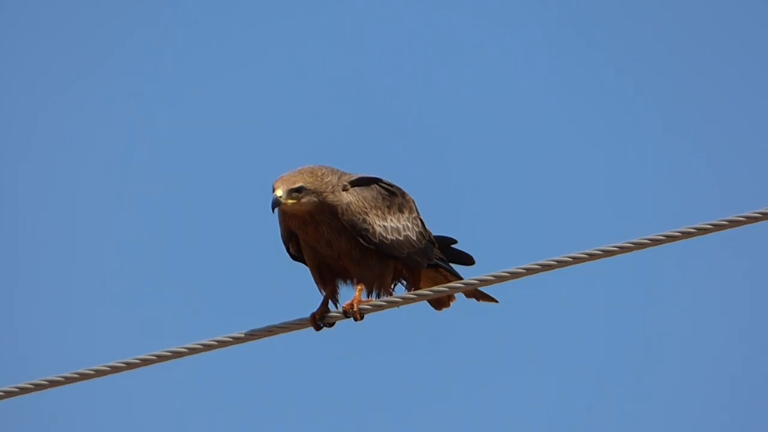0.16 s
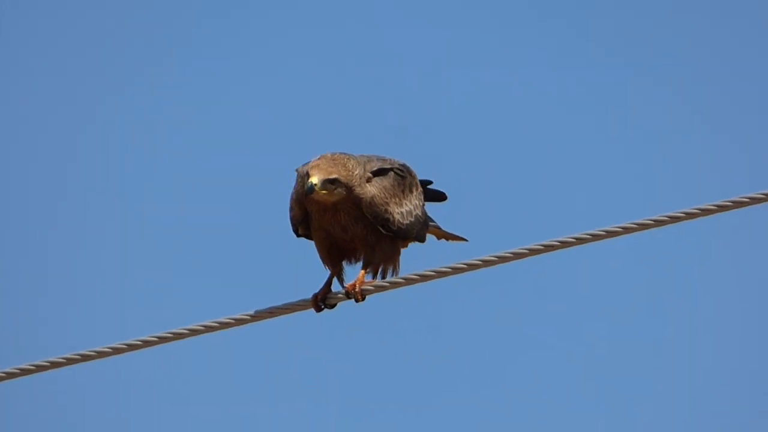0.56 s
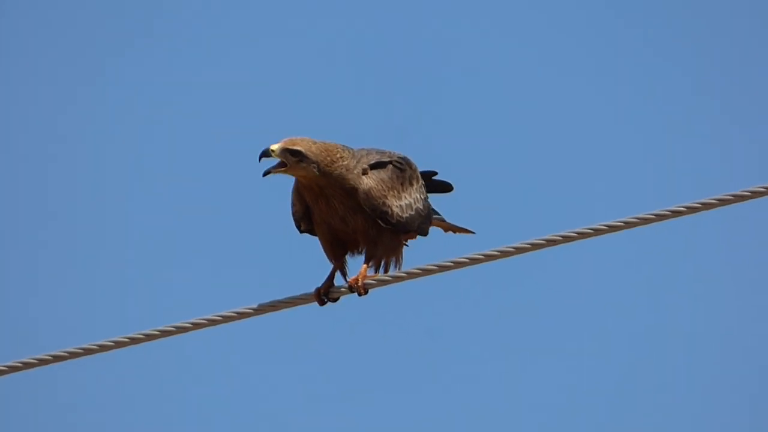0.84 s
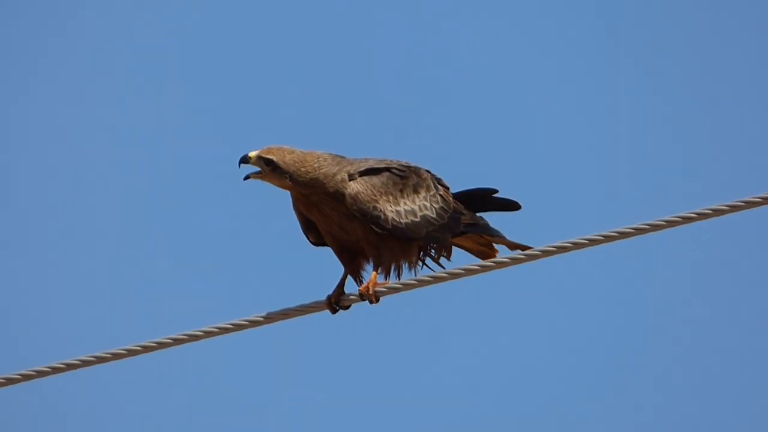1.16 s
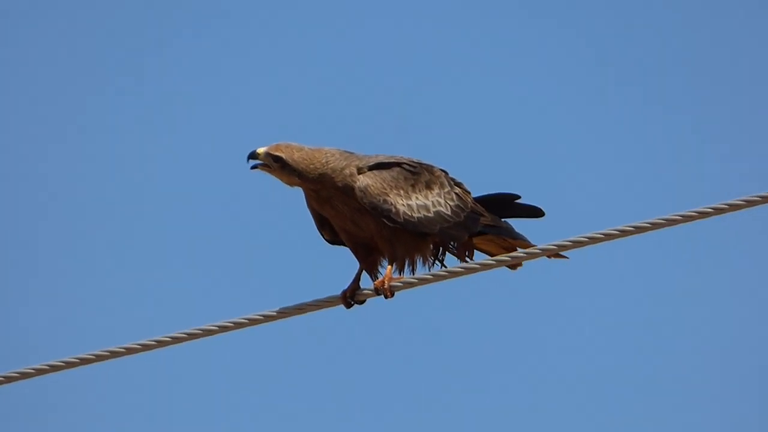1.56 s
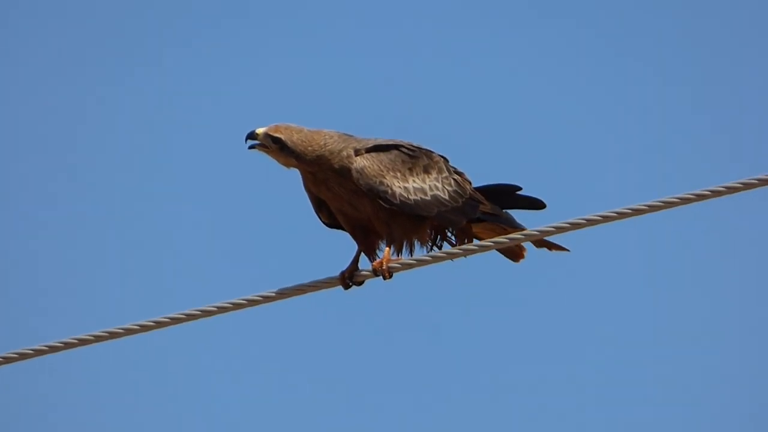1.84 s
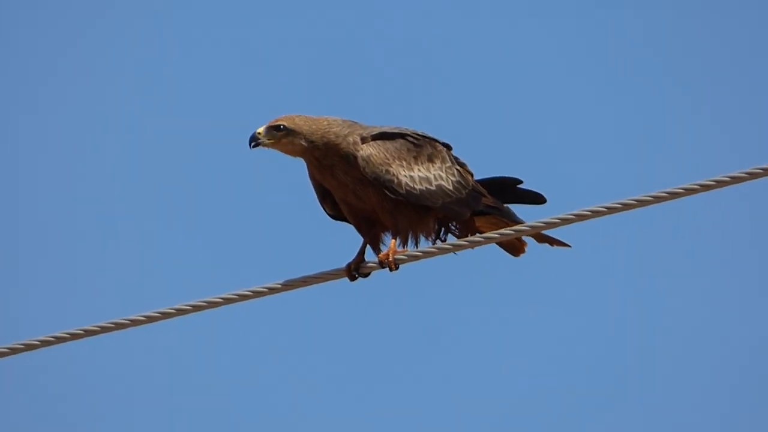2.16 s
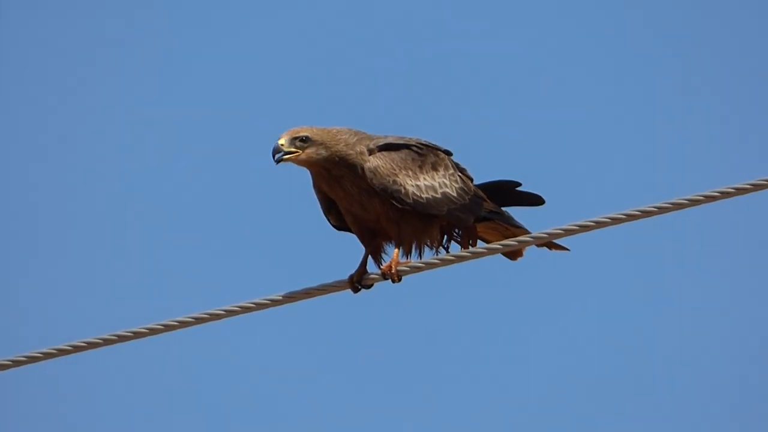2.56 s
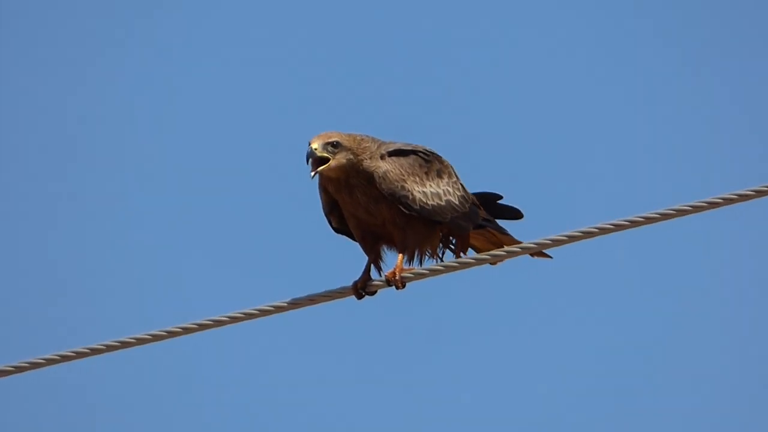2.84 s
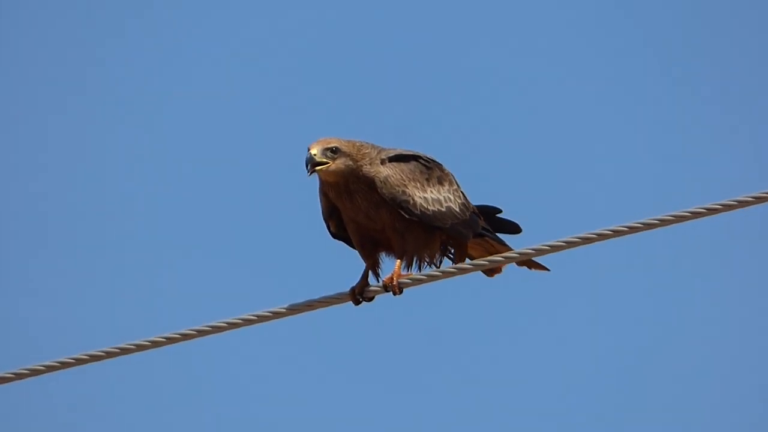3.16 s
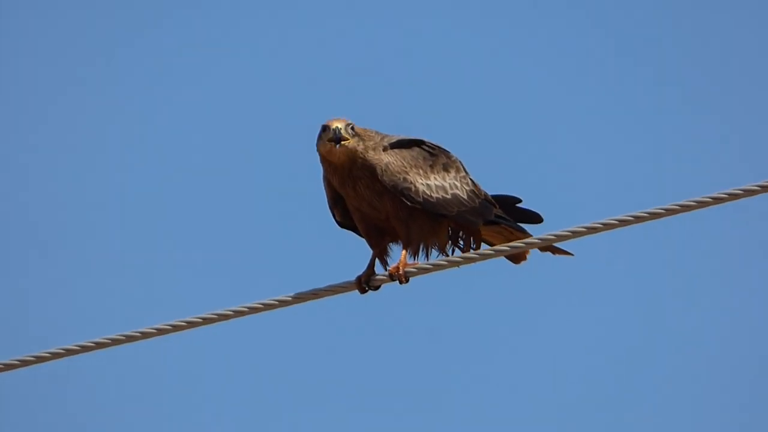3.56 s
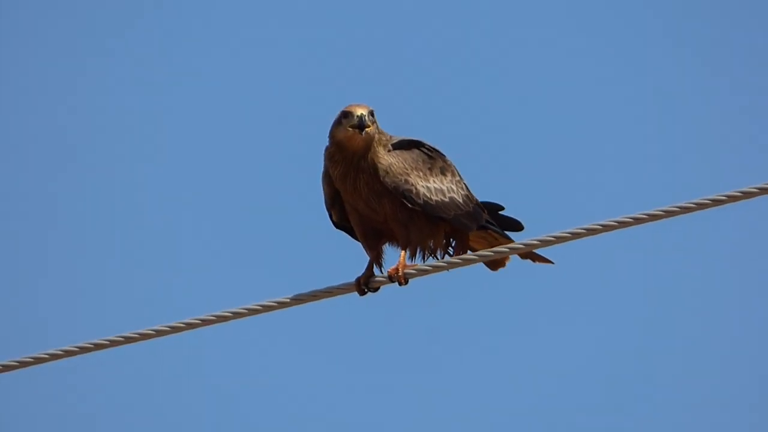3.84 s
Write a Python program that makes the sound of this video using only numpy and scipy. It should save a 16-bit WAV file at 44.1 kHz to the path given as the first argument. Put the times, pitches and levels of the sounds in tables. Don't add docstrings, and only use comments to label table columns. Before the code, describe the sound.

Silence until 0.33 s, then faint hum, hiss and wind. A kite yelps shrilly at 0.95 s, hiccups at 1.28, and quavers rapidly, sinking slightly, until 2.2. Soft gusts thump, mostly left, around 0.9 and 1.4; a sharp tiny click at 2.5. At 2.9 a louder whistle leaps up, drops, holds, then quavers brighter and rougher from 3.3 to 4.0, over a faint distant kite's rising whistles. Light open-air echo.

```python
import sys
import numpy as np
from scipy import signal
from scipy.fft import rfft, irfft, next_fast_len
from scipy.io import wavfile
from scipy.ndimage import uniform_filter1d, map_coordinates

SR = 44100
rng = np.random.default_rng(int(sys.argv[2]) if len(sys.argv) > 2 else 0)


def wrap_up_sound(samples):
    columns = np.atleast_2d(samples).T
    tamed = np.clip(columns, -1, 1)
    steps = np.round(tamed * 32767).astype(np.int16)
    wavfile.write(sys.argv[1], SR, steps)


def attenuation_scalar(level_db):
    decades = np.asarray(level_db, float) / 20
    return 10 ** decades


N = 176400

SIDE_TONES_DB = [-21, -16, -22, -22, -22, -21, -33, -36]
# start [s], length [s], pitch [Hz], level [dB].
VOICE_BREAKS = [
    (1.345, .026, 790, -55),
    (1.652, .008, 760, -70),
    (1.8, .012, 760, -70),
    (3.905, .045, 745, -46),
    (3.978, .034, 760, -44),
]
# start [s], length [s], level [dB].
BREATH_PUFFS = [
    (.918, .035, -59),
    (1.256, .05, -59),
    (2.903, .016, -55),
]
# frequency [Hz], gain [dB].
FACING_COLOUR = [(4700, -8), (5100, -2), (7200, -10), (8600, -12), (9800, -40), (10600, -22), (12300, -20),
                 (15500, -24)]
FACING_ORDERS_DB = [0, 0, -14, -11, -11]
FACING_SIDE_RATIO = .36
EDGE_S = .004


def unit(x):
    return x / np.sqrt(np.mean(x ** 2) + 1e-20)


def along(points, hz):
    f, v = np.transpose(points)
    return np.interp(np.log(hz + 1), np.log(f + 1), v)


def wobble(rate, size=N):
    knots = rng.standard_normal(int(size * rate / SR) + 4)
    return map_coordinates(knots, [np.arange(size) * rate / SR])


def filtered(x, response):
    m = next_fast_len(N + SR // 2)
    return irfft(rfft(x, m) * response(np.fft.rfftfreq(m, 1 / SR)), m)[..., :N]


def patchy(patchy_db):
    z = signal.stft(rng.standard_normal((2, N)), nperseg=512)[2]
    field = uniform_filter1d(rng.standard_normal(z.shape[1:]), 7, 0)
    field = uniform_filter1d(field, 6, 1)
    fade = 1 / (1 + (np.arange(len(field)) * SR / 512 / 1800) ** 4)
    gain = attenuation_scalar(patchy_db * unit(field) * fade[:, None])
    return signal.istft(z * gain, nperseg=512)[1][:, :N]


def shell_ring(modes, f):
    return 1 + sum(attenuation_scalar(db) * 1j * f * w / (c * c - f * f + 1j * f * w) for c, w, db in modes)


def hum():
    # frequency [Hz], level [dB per Hz].
    hum_mid = [(40, -95), (110, -87), (300, -90), (800, -91), (1350, -96), (1600, -106), (3000, -114),
               (15000, -140)]
    hum_side = [(40, -114), (150, -100), (400, -92), (800, -88), (1350, -92), (1700, -104), (3000, -114),
                (14000, -130)]
    # frequency [Hz], width [Hz], gain [dB].
    shell_mid = [(156, 10, 11), (350, 40, 7), (458, 24, 17), (650, 50, 7), (743, 30, 16), (945, 40, 3),
                 (1170, 50, 5)]
    shell_side = [(450, 50, 6), (650, 70, 8), (850, 70, 10)]
    # frequency [Hz], turn [radians].
    side_turn = [(160, .3), (350, 2.7), (600, 1.6), (1200, 1.2)]
    # frequency [Hz], level [dB per Hz].
    hiss_curve = [(1000, -112), (2100, -102), (2600, -108), (5200, -108), (6500, -113), (8000, -111),
                  (13000, -115), (15500, -121)]
    # time [s], strength [dB].
    wind_curve = [(0.34, -54), (0.81, -49), (2.03, -51), (2.05, -44), (2.1, -61), (2.14, -50), (2.21, -56),
                  (2.32, -48), (2.58, -53), (2.62, -64), (2.64, -50), (2.85, -47), (2.89, -53), (3.51, -51),
                  (3.54, -64), (3.56, -55), (3.76, -49), (4.0, -52)]
    # time [s], peak [dB].
    flurry_peaks = [(0.683, -43), (0.749, -41), (0.794, -43), (0.884, -39), (2.24, -44), (2.27, -43),
                    (2.297, -38), (2.49, -40), (2.644, -42), (2.681, -40), (2.727, -41)]
    t = np.arange(N) / SR

    a, b = patchy(patchy_db=1.8) * np.sqrt(SR / 2)
    share = lambda hz: .7 / (1 + (hz / 1700) ** 6)
    across = lambda hz: attenuation_scalar(along(hum_side, hz)) * shell_ring(shell_side, hz)
    turned = lambda hz: np.exp(1j * along(side_turn, hz)) * share(hz)
    mid = filtered(a, lambda hz: attenuation_scalar(along(hum_mid, hz)) * shell_ring(shell_mid, hz))
    side = filtered(a, lambda hz: across(hz) * turned(hz))
    side = side + filtered(b, lambda hz: across(hz) * np.sqrt(1 - share(hz) ** 2))
    pair = np.array([mid + side, mid - side])

    flurry = 0
    for s, db in flurry_peaks:
        rise = np.clip((t - s) / .004, 0, 1)
        flurry = flurry + attenuation_scalar(db + 37) * rise * np.exp(-np.abs(t - s) / .02)
    wind_db = np.interp(t, *np.transpose(wind_curve)) + 52
    gain = attenuation_scalar(.7 * wind_db + 1.5 * wobble(14)) * (1 + flurry)
    windy = filtered(pair, lambda hz: 1 / (1 + (np.log(hz / 620 + 1e-9) / .7) ** 4))

    hiss = filtered(rng.standard_normal((2, N)) * np.sqrt(SR / 2), lambda hz: attenuation_scalar(along(hiss_curve, hz)))
    mid, side = hiss * attenuation_scalar([[0], [-4]])
    return pair + windy * (gain - 1) + [mid + side, mid - side]


def gusts():
    # centre [s], length [s], level [dB].
    gust_rows = [(.36, .06, -56), (.7, .12, -54), (.79, .04, -54), (.86, .05, -44), (.96, .05, -52),
                 (1.26, .06, -43), (1.35, .14, -47), (1.447, .025, -37), (1.57, .2, -52), (2.98, .05, -53),
                 (3.63, .08, -55), (3.85, .25, -56), (3.45, .2, -58)]
    # frequency [Hz], gain [dB].
    thump_curve = [(30, -26), (80, -3), (190, 0), (330, -20), (600, -50), (1200, -120)]
    t = np.arange(N) / SR
    strength = sum(attenuation_scalar(db) * np.exp(-(2 * (t - s) / length) ** 2) for s, length, db in gust_rows)
    noise = filtered(rng.standard_normal((2, N)), lambda hz: attenuation_scalar(along(thump_curve, hz)))
    lumps = attenuation_scalar(3 * np.array([wobble(25), wobble(25)]))
    port_gain = attenuation_scalar([[5], [-3]])
    return port_gain * strength * unit((noise + .6 * noise[::-1]) * lumps)


def add(out, s, x):
    t = np.arange(len(x)) / SR
    edge = np.clip(np.minimum(t, t[-1] - t) / EDGE_S, 0, 1)
    part = out[round(s * SR):][:len(x)]
    part += (x * np.sin(np.pi / 2 * edge) ** 2)[:len(part)]


def voice(hz, db, over_db, tone_db, side_db, beak, ratio):
    n, (colour, orders_db) = len(hz), beak
    phase = 2 * np.pi * np.cumsum(hz) / SR
    tone = attenuation_scalar(tone_db) * np.exp(1j * phase)
    overs = 0
    for k, order_db in zip(range(2, 7), orders_db):
        fading_db = 1.0 * k * wobble(30, size=n)
        level_db = over_db + order_db + along(colour, k * hz) + fading_db
        overs = overs + attenuation_scalar(level_db) * np.exp(1j * k * phase)

    second = 2 * np.pi * np.cumsum(hz * ratio * (1 + .05 * wobble(90, size=n))) / SR
    breath = 1 + attenuation_scalar(-7) * (wobble(1500, size=n) + 1j * wobble(1500, size=n))
    pair = breath * (np.exp(1j * second) + attenuation_scalar(-12) * np.exp(-1j * second))
    haze = wobble(5000, size=n) + 1j * wobble(5000, size=n)
    burst = attenuation_scalar(side_db + 3 * wobble(35, size=n))
    rasp = burst * haze * (attenuation_scalar(-17) * tone + attenuation_scalar(-5) * overs)
    stack = (tone + overs) * (1 + burst * pair) + rasp
    shimmer_db = .7 * wobble(70, size=n)
    return np.sqrt(2) * attenuation_scalar(db + shimmer_db) * np.real(stack)


def note(rows, side_db, beak, ratio):
    s, *cols = np.transpose(rows)
    t = np.arange(s[0] - EDGE_S / 2, s[-1] + EDGE_S / 2, 1 / SR)
    glide = round(.008 * SR) + 1
    hz, db, over_db = [uniform_filter1d(np.interp(t, s, c), glide, mode="nearest") for c in cols]
    return t[0], voice(hz, db, over_db, 0, side_db, beak, ratio)


def quaver(rows, rule, beak, ratio):
    s, crest, trough, db = np.transpose(rows)
    start, end, best_hz, loss_db, over_db, first_db, last_db, dip_db = rule
    t, step = np.arange(start, end, 1 / SR), np.mean(np.diff(s))
    turn = np.interp(t, np.r_[s[0] - step, s, s[-1] + step], np.arange(len(s) + 2))
    swing = np.cos(2 * np.pi * turn)
    top, low = np.interp(t, s, crest), np.interp(t, s + step / 2, trough)
    hz = low + (top - low) * (1 + swing) / 2
    tone_db = -loss_db * ((hz - best_hz) / 100) ** 2
    level_db = np.interp(t, s + step / 2, db)
    side_db = np.linspace(first_db, last_db, len(t))
    return start, voice(hz, level_db, over_db - dip_db * swing, tone_db, side_db, beak, ratio)


def kite(notes, sides_db, trill, beak, ratio, breaks, puffs):
    # frequency [Hz], gain [dB].
    puff_curve = [(900, -30), (1600, -6), (3300, 0), (6000, -14), (13000, -30)]
    # multiple of the pitch, level [dB].
    break_parts = [(2, -5), (3, -6), (4, 0), (5, -12)]
    out = np.zeros(N)
    air = unit(filtered(rng.standard_normal(N), lambda hz: attenuation_scalar(along(puff_curve, hz))))
    for rows, side_db in zip(notes, sides_db):
        add(out, *note(rows, side_db, beak, ratio))
    if trill:
        add(out, *quaver(*trill, beak, ratio))
    for s, length, hz, db in breaks:
        u = np.linspace(0, np.pi, round(length * SR))
        phase = 2 * np.pi * np.cumsum(hz * (1 + .1 * (1 - np.sin(u)))) / SR
        whistle = out[round(s * SR):][:len(u)]
        add(out, s, -whistle * np.sqrt(np.abs(np.sin(u)))[:len(whistle)])
        add(out, s, attenuation_scalar(db) * np.sin(u) * sum(attenuation_scalar(g) * np.sin(k * phase) for k, g in break_parts))
    for s, length, db in puffs:
        add(out, s, attenuation_scalar(db) * air[round(s * SR):][:round(length * SR)])
    return out


def side_on_call():
    # time [s], pitch [Hz], level [dB], overtones [dB].
    yelp = [
        (.939, 2500, -50, 8),
        (.955, 2700, -39, 3),
        (.972, 2800, -33, -3),
        (.99, 2832, -35, -6),
        (1.012, 2750, -36, -3),
        (1.035, 2540, -49, 6),
        (1.095, 2425, -52, 0),
        (1.115, 2390, -57, -16),
        (1.205, 2325, -58, -14),
    ]
    hiccup = [
        (1.284, 2430, -48, 4),
        (1.295, 2520, -43, 5),
        (1.308, 2555, -45, 6),
        (1.33, 2330, -42, -2),
        (1.352, 2110, -52, -8),
    ]
    # time [s], pitch [Hz], level [dB], overtones [dB].
    catches = [
        [(1.262, 2130, -58, -25), (1.284, 2400, -52, -20)],
        [(1.262, 2880, -56, -25), (1.285, 3350, -48, -25)],
    ]
    # crest time [s], crest pitch [Hz], trough pitch [Hz], level [dB].
    swings_aside = [(1.381, 2373, 2320, -44.1), (1.427, 2403, 2215, -43.5), (1.487, 2319, 2219, -43.0),
                    (1.541, 2349, 2258, -42.3), (1.595, 2378, 2331, -43.9), (1.649, 2472, 2268, -42.6),
                    (1.697, 2406, 2227, -40.5), (1.753, 2354, 2285, -43.9), (1.805, 2441, 2205, -43.1),
                    (1.855, 2328, 2116, -43.1), (1.909, 2270, 2167, -42.2), (1.959, 2318, 2171, -43.9),
                    (2.011, 2305, 2046, -45.5), (2.069, 2310, 2040, -45.0), (2.127, 2270, 2019, -47.1),
                    (2.189, 2315, 2012, -47.4)]
    # start [s], end [s], best pitch [Hz], loss [dB per (100 Hz off) squared],
    # overtones [dB], first and last side tones [dB], overtone swing towards the troughs [dB].
    rule_aside = (1.362, 2.216, 2270, 1.8, -17, -44, -40, 7)
    # frequency [Hz], gain [dB].
    colour_aside = [(4100, -5), (4500, -16), (5100, -2), (5600, -2), (6300, -9), (6900, -16), (7500, -13),
                    (8600, -10)]
    orders_aside = [0, 0, -32, -24, -50]
    return kite([yelp, hiccup, *catches], SIDE_TONES_DB[:4], (swings_aside, rule_aside),
                (colour_aside, orders_aside), .33, VOICE_BREAKS[:3], BREATH_PUFFS[:2])


def ticks():
    # time [s], peak [dB].
    tick_rows = [
        (1.808, -51),
        (1.913, -54),
        (1.995, -50),
        (2.092, -56),
        (2.533, -32),
    ]
    out, t = np.zeros(N), np.arange(200) / SR
    for s, db in tick_rows:
        out[round(s * SR):][:len(t)] += attenuation_scalar(db - 60 * t / .003) * rng.standard_normal(len(t))
    return filtered(out, lambda hz: (1j * hz / (2600 + 1j * hz)) ** 4)


def yodel_call():
    # time [s], pitch [Hz], level [dB], overtones [dB].
    rise = [
        (2.916, 2640, -46, 4),
        (2.922, 2720, -37, 4),
        (2.934, 2880, -33, 0),
        (2.942, 3000, -26, -8),
        (2.947, 3090, -30, -8),
    ]
    peak = [
        (2.948, 3520, -27, -8),
        (2.96, 3525, -23, -11),
        (2.982, 3425, -28, -6),
        (3.0, 3230, -44, -2),
    ]
    hold = [
        (3.0, 2900, -40, 0),
        (3.012, 2745, -35, 0),
        (3.035, 2648, -40, 1),
        (3.062, 2680, -39, -2),
        (3.085, 2640, -40, -3),
        (3.112, 2670, -38, -6),
        (3.14, 2632, -39, -8),
        (3.218, 2730, -46, -16),
    ]
    jump = [
        (3.223, 3135, -43, -16),
        (3.265, 3162, -39, -14),
        (3.283, 3110, -46, -18),
    ]
    # frequency [Hz], gain [dB].
    colour_yodel = [(5300, -2), (6100, -8), (7100, -6), (8000, -18), (8500, -6), (9200, -18), (10500, -10),
                    (14500, -22)]
    orders_yodel = [0, 0, -16, -22, -30]
    return kite([rise, peak, hold, jump], SIDE_TONES_DB[4:], None, (colour_yodel, orders_yodel),
                FACING_SIDE_RATIO, [], BREATH_PUFFS[2:])


def facing_quaver():
    # crest time [s], crest pitch [Hz], trough pitch [Hz], level [dB].
    swings_facing = [(3.316, 2562, 2453, -42.6), (3.366, 2508, 2383, -43.0), (3.416, 2472, 2411, -44.3),
                     (3.464, 2505, 2396, -42.2), (3.516, 2486, 2344, -42.8), (3.57, 2484, 2375, -42.4),
                     (3.624, 2500, 2387, -41.0), (3.674, 2491, 2332, -42.1), (3.73, 2492, 2364, -40.6),
                     (3.784, 2531, 2376, -39.8), (3.838, 2530, 2319, -41.1), (3.894, 2481, 2300, -43.9),
                     (3.962, 2566, 2300, -41.6)]
    # start [s], end [s], best pitch [Hz], loss [dB per (100 Hz off) squared],
    # overtones [dB], first and last side tones [dB], overtone swing towards the troughs [dB].
    rule_facing = (3.285, 3.992, 2450, 1.5, 0, -27, -15, 0)
    return kite([], [], (swings_facing, rule_facing), (FACING_COLOUR, FACING_ORDERS_DB),
                FACING_SIDE_RATIO, VOICE_BREAKS[3:], [])


def far_answer():
    # time [s], pitch [Hz], level [dB], overtones [dB].
    answer_notes = [
        [(3.342, 2190, -56, -8), (3.42, 2340, -50, -8)],
        [(3.42, 2830, -54, -20), (3.55, 2850, -57, -20), (3.9, 3060, -62, -20)],
    ]
    return kite(answer_notes, SIDE_TONES_DB[6:], None, (FACING_COLOUR, FACING_ORDERS_DB),
                FACING_SIDE_RATIO, [], [])


def toward(x, pan_db, high_pan_db, lead_s):
    side = np.array([[1], [-1]]) / 2
    lean = lambda hz: along([(3600, pan_db), (5000, high_pan_db), (9000, 0)], hz)
    turn = lambda hz: 2 * np.pi * hz * lead_s * np.exp(-(hz / 6000) ** 2)
    return filtered(x, lambda hz: attenuation_scalar(lean(hz) * side) * np.exp(1j * turn(hz) * side))


def echoes(x):
    x = filtered(x, lambda hz: 1 / (1 + (hz / 6000) ** 8))
    t = np.arange(SR // 2) / SR
    t60_s, delay_s = .9, .03
    tail = rng.standard_normal((2, len(t))) * attenuation_scalar(-60 * t / t60_s) * (t > delay_s)
    return attenuation_scalar(-22) * signal.fftconvolve(x[None], tail / np.linalg.norm(tail[0]), axes=1)[:, :N]


def scene():
    aside = side_on_call()
    facing = yodel_call() + facing_quaver()
    far = far_answer()
    birds = toward(aside, -.3, -2.5, 2.5e-5)
    birds = birds + toward(facing, 1.9, -2.2, 3e-5)
    birds = birds + toward(far, 3.0, 3.0, 4e-5)
    return birds + echoes(aside + facing + far) + hum() + gusts() + ticks()


def low_pass(x):
    return signal.sosfilt(signal.butter(12, 16450, fs=SR, output="sos"), x)


def record(dry):
    start_s, settle_s = .3295, .1
    t = np.arange(N) / SR - start_s
    dry = filtered(dry, lambda hz: 1 / (1 + (hz / 15750) ** 80))
    offset = -.0002 - .0025 * np.exp(-np.abs(t) / settle_s)
    return low_pass(np.where(t > 0, dry + offset, 0))


dry = scene()
out = record(dry)
wrap_up_sound(out)
```